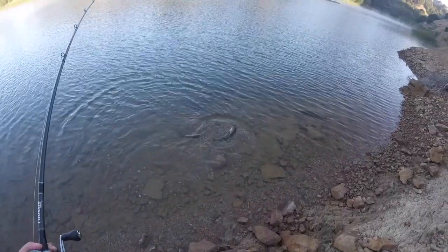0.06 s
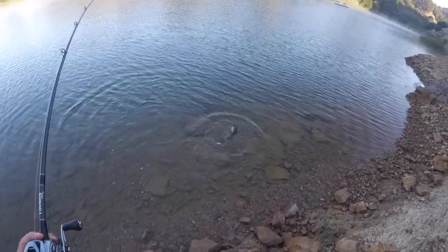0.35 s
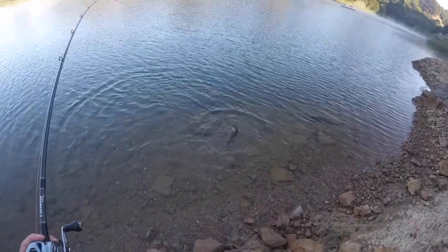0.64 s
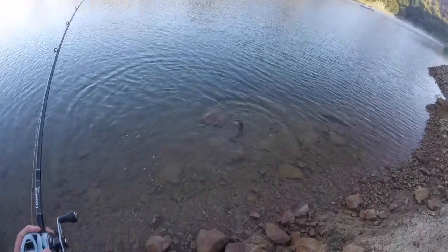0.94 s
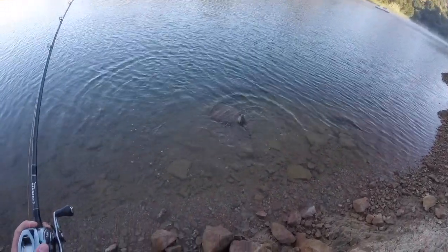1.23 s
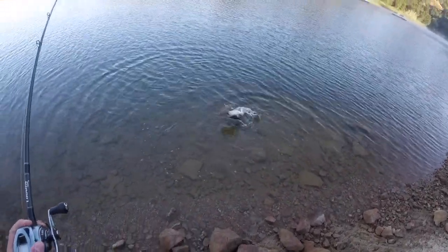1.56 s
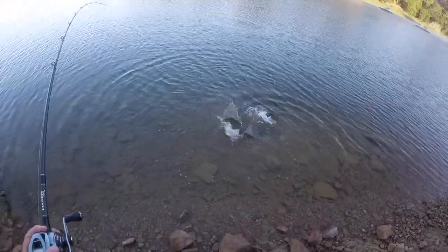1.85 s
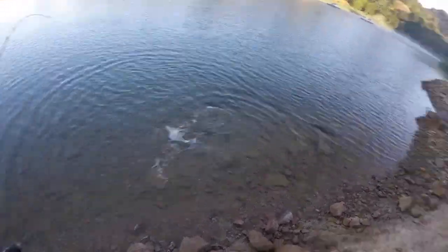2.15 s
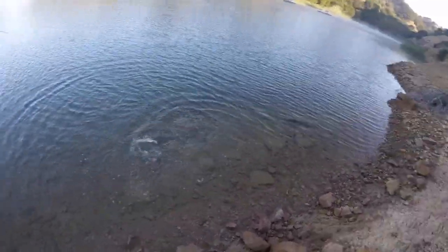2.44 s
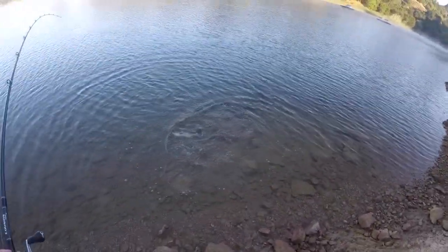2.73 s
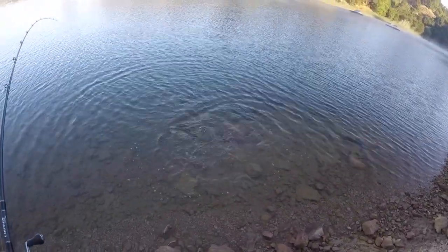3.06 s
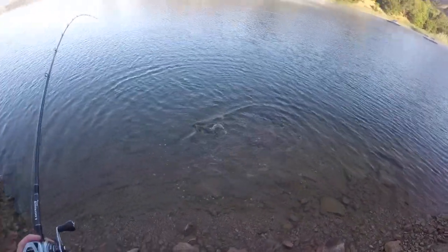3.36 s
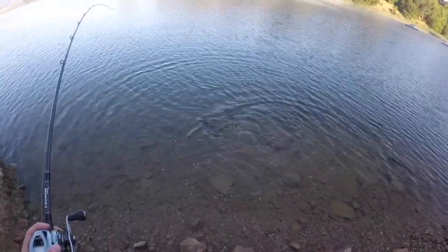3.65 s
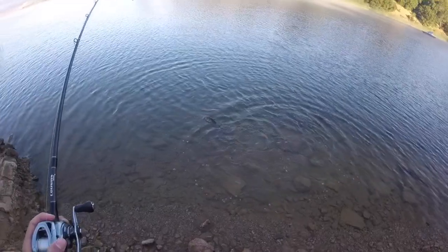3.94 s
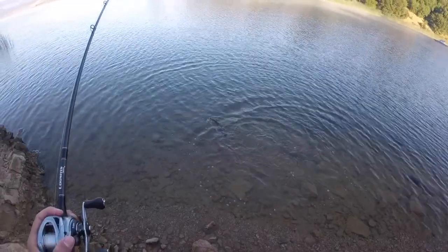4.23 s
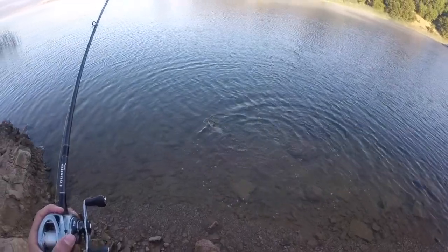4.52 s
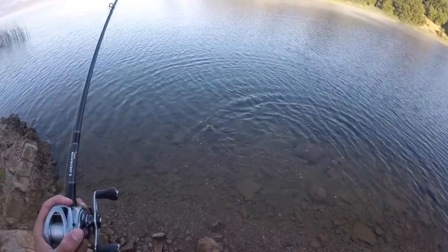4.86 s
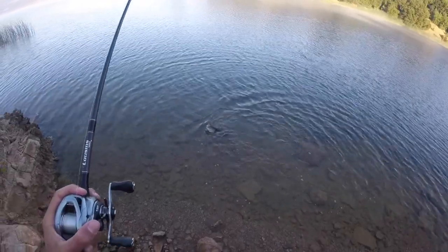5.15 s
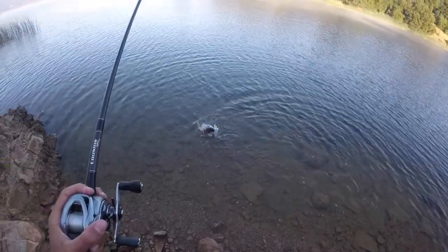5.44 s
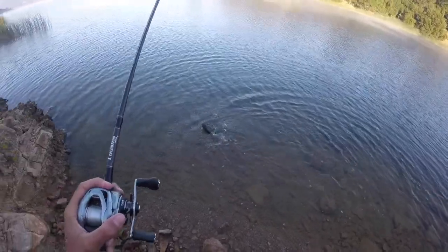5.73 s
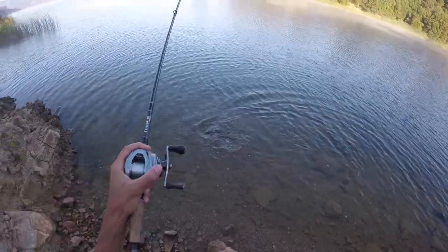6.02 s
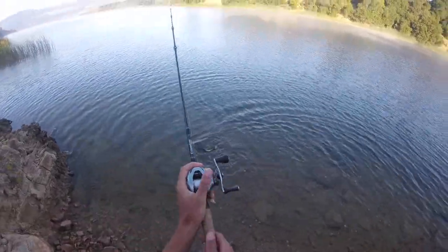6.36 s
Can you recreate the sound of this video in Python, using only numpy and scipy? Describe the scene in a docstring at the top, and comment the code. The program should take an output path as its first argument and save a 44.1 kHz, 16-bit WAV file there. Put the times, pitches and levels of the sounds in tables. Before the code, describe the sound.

A fish thrashes in shallow water in two splashy bursts, with gurgles and a quick fishing reel clack between them.

```python
"""A hooked fish in the shallows

A fish thrashes in two bouts in a calm lake, a few metres from the angler. Each tail stroke traps air
pockets that ring as gliding bubbles, and the hardest slaps throw spray that patters back on the water.
The reel gives one double clack between the bouts. The stony bank returns weak echoes; behind it all
lie a low outdoor murmur and faint microphone hiss."""
import sys
import numpy as np
from scipy import signal
from scipy.fft import rfft, irfft, next_fast_len
from scipy.io import wavfile
from scipy.ndimage import uniform_filter1d

SR = 44100
rng = np.random.default_rng(int(sys.argv[2]) if len(sys.argv) > 2 else 0)


def transcribe(signal):
    """Save signal, clipped to [-1, 1], as a 16-bit WAV file at the path in sys.argv[1]."""
    frames = np.atleast_2d(signal).T
    limited = np.clip(frames, -1, 1)
    pcm = np.round(limited * 32767).astype(np.int16)
    wavfile.write(sys.argv[1], SR, pcm)


N = 290619

# Fin and drops strike the surface. Each row: start in seconds, level in dB, pitch in Hz.
SURFACE_SMACKS = [(0.3533, -43.5, 3640), (1.3037, -35, 1830), (1.341, -33.5, 1650), (1.4078, -27.5, 1550),
                  (1.4418, -29.5, 1530), (1.712, -23.5, 1440), (1.7474, -25, 5100), (2.0027, -21.5, 1490),
                  (2.1805, -27, 2860), (2.3668, -27, 2020), (2.5004, -30.5, 2020), (2.58, -38, 6900),
                  (2.8662, -36, 4800), (3.5034, -39, 1720), (5.2478, -31.5, 4050), (5.2625, -24.5, 1500),
                  (5.3108, -30, 1620), (5.371, -26, 2610), (5.4837, -27, 1990), (5.6012, -29.5, 2400),
                  (5.7694, -40, 1810), (5.8145, -33, 1570), (5.879, -36, 5600), (6.124, -40, 3220)]
# The tail lands flat. Each row: start in seconds, level in dB, cavity pitch in Hz.
TAIL_SLAPS = [(1.7874, -25, 370), (1.900, -29, 457), (1.991, -21, 278), (2.003, -13.5, 234)]


def gain_of(db):
    """Amplitude grows tenfold with every 20 dB."""
    return 10 ** (np.asarray(db) / 20)


def unit_rms(x):
    """Normalisation brings the mean power to one."""
    return x / np.sqrt(np.mean(x ** 2) + 1e-20)


def add(mix, start, sound):
    """Superposition: a sound adds to the mix from its start in seconds."""
    part = mix[max(round(start * SR), 0):][:len(sound)]
    part += sound[:len(part)]


def coloured(x, spectrum):
    """A minimum-phase filter shapes the spectrum causally; its phase follows from its log gain."""
    size = next_fast_len(N + SR // 2)
    hz, db = np.transpose(spectrum)
    bin_hz = abs(np.fft.fftfreq(size, 1 / SR))
    log_gain = np.log(gain_of(np.interp(np.log(bin_hz + 1), np.log(hz + 1), db)))
    response = np.exp(np.conj(signal.hilbert(log_gain)))[:size // 2 + 1]
    return irfft(rfft(x, size) * response, size)[:N]


def wander(per_s):
    """Interpolation between random values gives a slow fluctuation of rms one."""
    knots = rng.standard_normal(N // 32)
    return unit_rms(np.interp(np.arange(N) / SR * per_s, np.arange(len(knots)), knots))


def bubble(birth_hz, glide_to_hz, swell_s, fade_s):
    """An air pocket is a damped oscillator whose pitch glides as its size and depth change."""
    t = np.arange(0, swell_s + 4 * fade_s, 1 / SR)
    age = np.minimum(t / (swell_s + fade_s), 1.3)
    hz = np.minimum(birth_hz * (glide_to_hz / birth_hz) ** age, SR / 2)
    rise = np.sin(np.pi / 2 * np.minimum(t / swell_s, 1))
    decay = np.exp(-(np.maximum(t - swell_s, 0) / fade_s) ** 1.05)
    return rise * decay * np.sin(2 * np.pi * np.cumsum(hz) / SR)


def swarm(low_hz, high_hz, per_s, cycles, spread_db, db_per_octave, sizes):
    """Bubbles born at random, most rising in pitch, add incoherently; the sum has rms one."""
    out = np.zeros(N)
    for hz in np.geomspace(low_hz, high_hz, sizes):
        fade_s = cycles / hz * np.exp(0.44 * rng.standard_normal())
        glide = 2 ** rng.normal(0.099, 0.193)
        ring = bubble(hz, hz * glide, fade_s * rng.uniform(0.076, 0.48), fade_s)
        born = rng.random(N) < per_s / sizes / SR
        strength = gain_of(spread_db * np.minimum(rng.exponential(1, N), 3.5))
        rings = unit_rms(signal.oaconvolve(born * strength, ring)[:N])
        out += gain_of(db_per_octave * np.log2(hz / low_hz)) * rings
    return unit_rms(out)


def background():
    """Filtered noise: a low, slightly restless outdoor murmur and steady microphone hiss."""
    # Two noise spectra. Each row: frequency in Hz, relative spectral density in dB.
    murmur_spectrum = [(71, -46), (120, -24.5), (144, -3.5), (173, -1), (294, -16), (337, -15),
                       (429, -18.5), (590, -21.5), (627, -23), (708, -22), (1440, -27.5), (1780, -28),
                       (4500, -42.5), (5850, -69), (9900, -120)]
    hiss_spectrum = [(20, 8.5), (60, 8), (130, -20), (1000, -4), (4300, -41), (4800, -6.5), (5800, -4.5),
                     (6500, 3), (8000, 2.5), (10000, -1), (12000, -7), (15000, -10)]
    murmur = unit_rms(coloured(rng.standard_normal(N), murmur_spectrum)) * gain_of(-51 + .5 * wander(9))
    hiss = unit_rms(coloured(rng.standard_normal(N), hiss_spectrum)) * gain_of(-64.5)
    return murmur + hiss


def ripples():
    """Air entrainment: as the fish rolls, a ripple breaks into a gurgle and sparse tiny bubbles."""
    # Breaking ripples. Each row: start in seconds, level in dB.
    swirls = [(.29, -65), (2.66, -65), (2.819, -56.5), (2.989, -58), (3.226, -54.5), (3.32, -65),
              (3.37, -58), (3.628, -57.5), (6.37, -60)]
    rise_s, fade_s = 0.011, 0.098
    gain, t = np.zeros(N), np.arange(SR) / SR
    envelope = np.minimum(t / rise_s, 1) * np.exp(-np.maximum(t - rise_s, 0) / fade_s)
    for start, db in swirls:
        add(gain, start, gain_of(db) * envelope)
    gurgle = swarm(601, 1516, per_s=260, cycles=11.7, spread_db=2.5, db_per_octave=4.5, sizes=9)
    fizz = swarm(1600, 6000, per_s=320, cycles=6, spread_db=1.8, db_per_octave=-3.5, sizes=30)
    return gain * (gain_of(2) * gurgle + gain_of(1) * fizz)


def smacks():
    """An impact on the surface excites a heavily damped oscillation, a snap of a few cycles."""
    out = np.zeros(N)
    for start, db, hz in SURFACE_SMACKS:
        add(out, start, gain_of(db) * bubble(hz, hz * 1.03, 0.21 / hz, 2.2 / hz))
    return out


def spatter_envelope():
    """Each smack throws up extra drops, whose level decays exponentially."""
    gain, t = np.zeros(N), np.arange(SR // 10) / SR
    for start, db, _ in SURFACE_SMACKS:
        add(gain, start, gain_of(db - 12) * np.exp(-t / 0.008))
    return gain


def churn():
    """Resonance rises as size falls: large pockets slosh, middling ones babble, fine spray crackles."""
    # The fish's effort, one curve a bout. Each row: time in seconds, effort in dB.
    bouts = [
        [(1.27, -56), (1.42, -51.5), (1.56, -46), (1.64, -42), (1.86, -42), (2.04, -42.5), (2.15, -48.5),
         (2.44, -53), (2.62, -71)],
        [(5.2, -49.5), (5.245, -54), (5.27, -41.5), (5.34, -56), (5.375, -42.5), (5.49, -42.5), (5.63, -52),
         (5.8, -58), (5.9, -72)],
    ]
    full_effort, t = gain_of(-35.5), np.arange(N) / SR
    effort = sum(gain_of(np.interp(t, *np.transpose(bout), left=-200, right=-200)) for bout in bouts)
    effort = uniform_filter1d(effort, size=300)
    stir = np.hypot(effort * gain_of(2.5 * wander(70)), spatter_envelope())
    heave = gain_of(-46) * (effort / full_effort) ** .7
    density = np.clip((stir / full_effort) ** 1.3, 0.055, 1)  # gentler thrashing makes fewer bubbles
    slosh = swarm(261.5, 739, per_s=450, cycles=2.12, spread_db=3, db_per_octave=0.5, sizes=12)
    babble = swarm(801.5, 2522, 2000 * density, cycles=5.8, spread_db=2.5, db_per_octave=1.2, sizes=26)
    spray = swarm(2595, 7100, 4400 * density, cycles=4.16, spread_db=2.5, db_per_octave=-6.5, sizes=28)
    mist = swarm(6600, 13100, 3000 * density, cycles=1.1, spread_db=0.5, db_per_octave=-7, sizes=10)
    drops = gain_of(-1) * babble + gain_of(-3) * spray + gain_of(-12) * mist
    return slosh * heave + stir * drops / unit_rms(np.sqrt(density))


def gulps():
    """The resonance of a hollow in the water rises as it shrinks and sinks as it widens."""
    # Each row: start in seconds, level in dB, first pitch in Hz, glide in octaves, its time in seconds.
    hollows = [(1.237, -36, 794, -0.19, 0.033), (1.304, -28, 187.6, 1.5, 0.0188),
               (1.942, -34.5, 335, 0.77, 0.051), (2.874, -39, 307, 0.61, 0.026),
               (2.898, -39.5, 505, 0.56, 0.013), (3.022, -48.5, 1480, .7, 0.015),
               (5.421, -36.5, 290, 0.42, 0.014), (5.719, -39, 1290, 0.59, .009),
               (5.9978, -36, 1930, 1.6, 0.0063)]
    out, swell_share = np.zeros(N), 0.55
    for start, db, hz, octaves, glide_s in hollows:
        note = bubble(hz, hz * 2 ** octaves, swell_share * glide_s, (1 - swell_share) * glide_s)
        add(out, start, gain_of(db) * note)
    return out


def plops():
    """Single air pockets ring at their Minnaert resonance; small ones rise in pitch, large ones sink."""
    # Each row: start in seconds, level in dB, first pitch in Hz, decay time in cycles.
    pockets = [(1.340, -30, 630, 2.7), (1.41, -31.5, 1115, 4.4), (1.444, -39, 1325, 12),
               (1.425, -28.5, 2250, 2.7), (1.543, -25.5, 2410, 5.4), (1.559, -30, 1025, 5.7),
               (1.605, -26.5, 374, 5.5), (1.702, -33.5, 322, 7), (1.709, -29, 1360, 7),
               (1.828, -26, 1640, 5.5), (2.016, -43, 244, 6.4), (2.437, -46, 397, 15),
               (2.527, -37.5, 1170, 5.3), (2.850, -31.5, 365.6, 6.3), (2.911, -26.5, 1090, 4.8),
               (2.999, -34, 1240, 2.4), (3.244, -42, 660, 6), (3.334, -42, 740, 8.1),
               (3.442, -48, 1140, 8.8), (3.67, -36.5, 2920, 5.1), (5.213, -35.5, 406, 2.4),
               (5.262, -32.5, 1180, 6.8), (5.272, -33, 1470, 6.3), (5.284, -26.5, 1500, 2.4),
               (5.396, -31.5, 292, 1.5), (5.408, -36.5, 1064, 7), (5.469, -32, 1240, 5.6),
               (5.483, -32, 337, 2), (5.530, -40, 403, 3), (5.6, -34.5, 430, 2.5), (5.672, -38.5, 454, 5.6),
               (5.8, -36, 1590, 4.8), (6.342, -46.5, 2880, 9.4), (6.421, -44.5, 2330, 10)]
    out, steady_hz = np.zeros(N), 860
    for start, db, hz, cycles in pockets:
        fade_s = cycles / hz
        glide = (hz / steady_hz) ** 0.071
        add(out, start, gain_of(db) * bubble(hz, hz * glide, 0.25 * fade_s, fade_s))
    return out


def slaps():
    """The tail punches a cavity whose damped modes thump under a broadband crack of spray."""
    # The cavity's modes. Each row: frequency as a multiple of its pitch, relative level in dB.
    cavity_modes = [(1, 7), (1.55, -1.5), (2.1, -5.5)]
    out, t = np.zeros(N), np.arange(SR // 20) / SR
    band = signal.butter(2, [500, 6600], "band", fs=SR, output="sos")
    crack_peak_s = 0.0044
    crack_envelope = t / crack_peak_s * np.exp(1 - t / crack_peak_s)
    for start, db, hz in TAIL_SLAPS:
        for multiple, mode_db in cavity_modes:
            thump = bubble(hz * multiple, hz * multiple, swell_s=0.0016, fade_s=0.0028)
            add(out, start, gain_of(db + mode_db) * thump)
        crack = unit_rms(signal.sosfilt(band, rng.standard_normal(len(t))))
        add(out, start, gain_of(db - 18.5) * crack * crack_envelope)
    return out


def falling_spray():
    """Drops from each slap land after their time of flight, ticking and trapping small bubbles."""
    flight_s, spread_s = 0.21, 0.071
    t = np.arange(N) / SR
    shower = sum(gain_of(db - 35.5) * np.exp(-((t - start - flight_s) / spread_s) ** 2)
                 for start, db, _ in TAIL_SLAPS)
    ticks = swarm(4000, 9800, per_s=900, cycles=3, spread_db=3.5, db_per_octave=2, sizes=8)
    drips = swarm(860, 5700, per_s=1500, cycles=3.4, spread_db=3.5, db_per_octave=-2.5, sizes=16)
    return shower * (gain_of(-4) * ticks + gain_of(3) * drips)


def reel():
    """The thumb bar snaps down with a short rattle; the impact excites the modes of reel and rod."""
    # The bar's impacts. Each row: start in seconds, level in dB, relative strength of rattle and ring.
    clacks = [(4.9205, -34, 0.15), (4.938, -35.5, 0.72)]
    # Reel and rod. Each row: frequency in Hz, relative level in dB, time to fall 60 dB in seconds.
    body_modes = [(315, -5, 0.21), (613, 0, 0.43), (795, -7, 0.26), (1040, 2.5, 0.16), (1170, -8, 0.33),
                  (1420, -13, 0.53), (1650, -6, .15), (1910, 2, 0.087), (2290, 1, 0.17), (4500, -17, 0.11),
                  (5300, -13, 0.096)]
    out, t = np.zeros(N), np.arange(SR // 2) / SR
    band = signal.butter(6, [200, 5900], "band", fs=SR, output="sos")
    for start, db, ring in clacks:
        body = sum(gain_of(mode_db - 60 * t / t60) * np.sin(2 * np.pi * (hz * t + rng.random()))
                   for hz, mode_db, t60 in body_modes)
        noise = unit_rms(signal.sosfilt(band, rng.standard_normal(len(t))))
        snap = .5 * noise * np.exp(-t / 0.0011)
        rattle = 0.36 * noise * np.exp(-t / 0.029)
        add(out, start, gain_of(db) * (snap + ring * (rattle + gain_of(-9) * body)))
    return out


def with_bank_echoes(direct):
    """Scattering from the stony bank adds a weak, decaying train of echoes."""
    echoes_per_s, first_echo_s, t60 = 2500, .005, 0.27
    t = np.arange(SR // 3) / SR
    taps = rng.standard_normal(len(t)) * (rng.random(len(t)) < echoes_per_s / SR) * (t > first_echo_s)
    tail = taps * gain_of(-60 * t / t60)
    return direct + gain_of(-11.5) * signal.oaconvolve(direct, tail / np.linalg.norm(tail))[:N]


def scene():
    """Water and reel superpose, coloured by the microphone's response, over the background."""
    # The microphone's response. Each row: frequency in Hz, gain in dB.
    mic_response = [(60, -82), (110, -27), (150, -17.5), (220, 3.5), (3000, -1), (4000, -1), (5000, 3.5),
                    (6000, 2.5), (6800, -4.5), (8000, -6), (10700, -4), (11500, -18.5), (15000, -12)]
    water = slaps() + plops() + gulps() + smacks() + churn() + falling_spray() + ripples()
    foreground = coloured(with_bank_echoes(water) + reel(), mic_response)
    return (foreground + background())[None]


def record(dry):
    """A linear-phase low-pass filter removes the highest treble."""
    low_pass = signal.firwin(511, cutoff=15350, window=("kaiser", 9), fs=SR)
    return signal.oaconvolve(dry, low_pass[None], "same")


dry = scene()
out = record(dry)
transcribe(out)
```